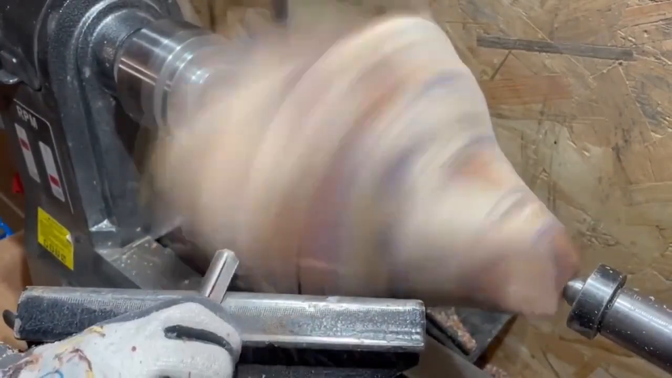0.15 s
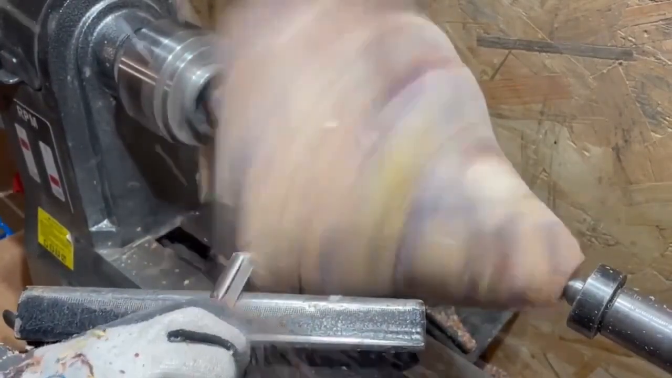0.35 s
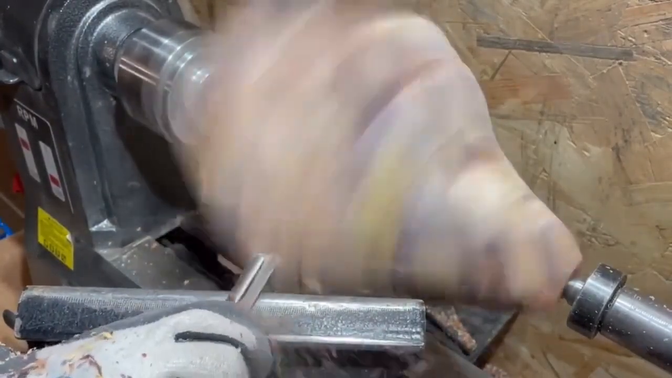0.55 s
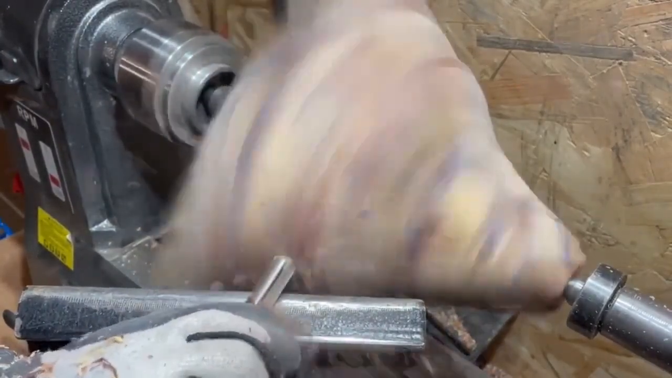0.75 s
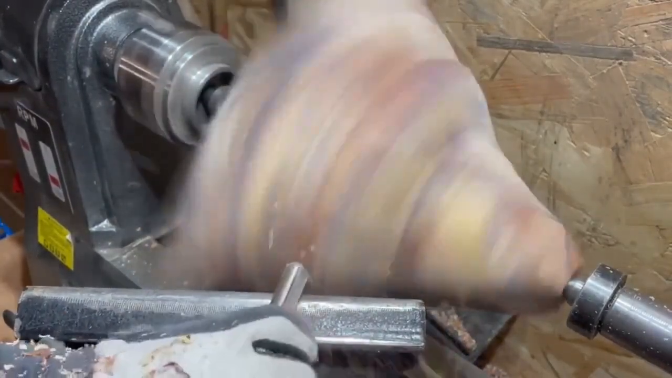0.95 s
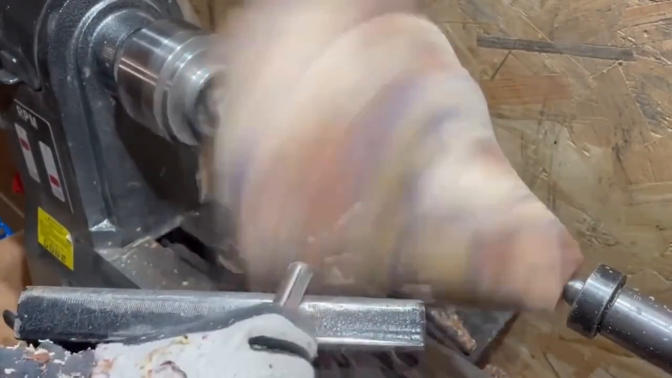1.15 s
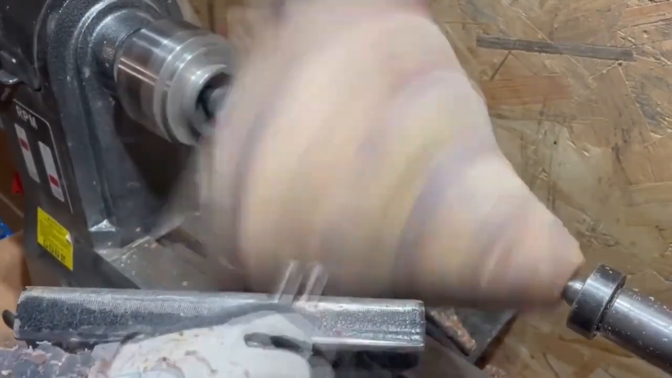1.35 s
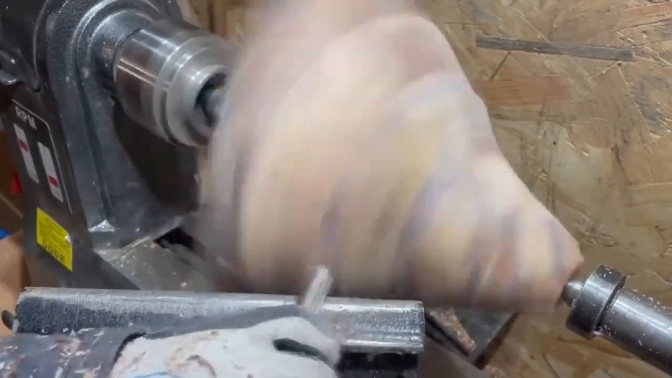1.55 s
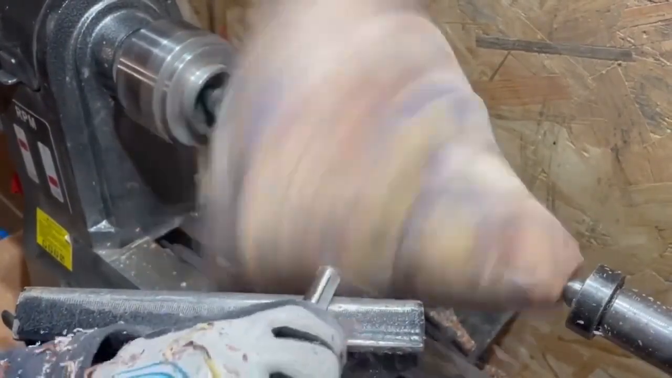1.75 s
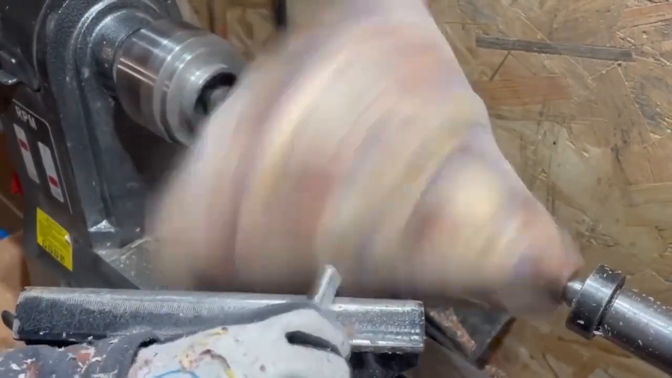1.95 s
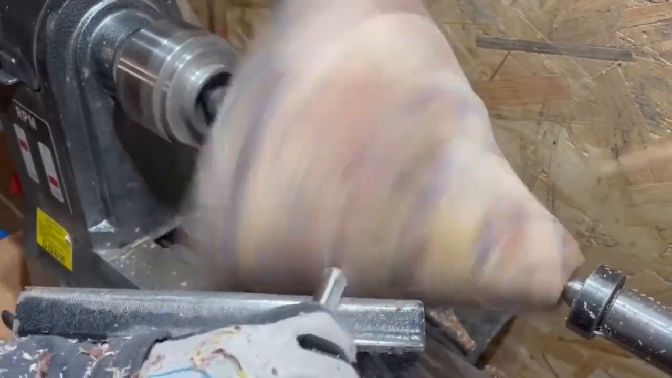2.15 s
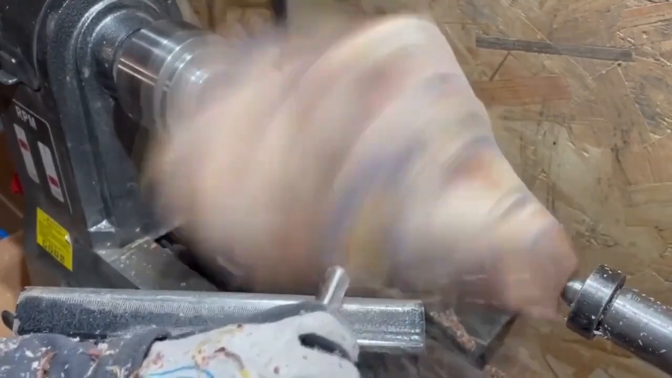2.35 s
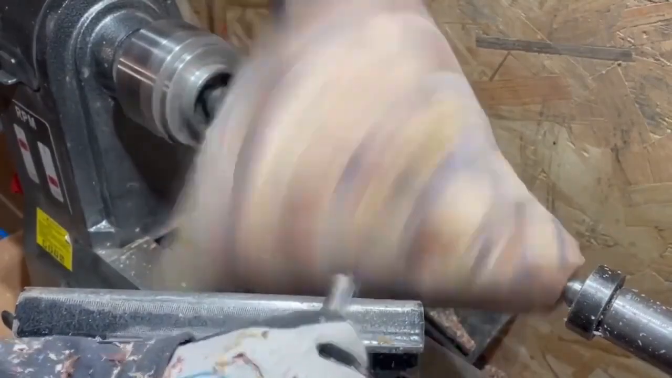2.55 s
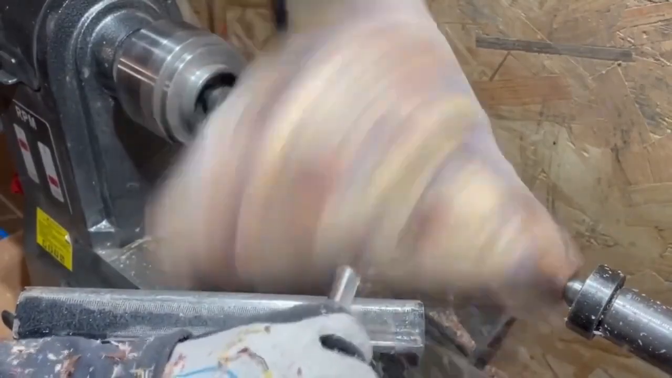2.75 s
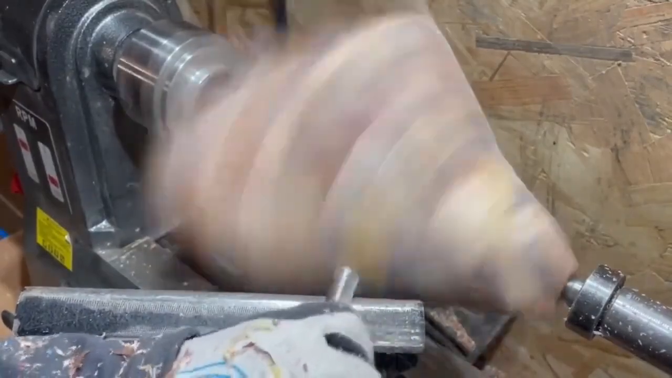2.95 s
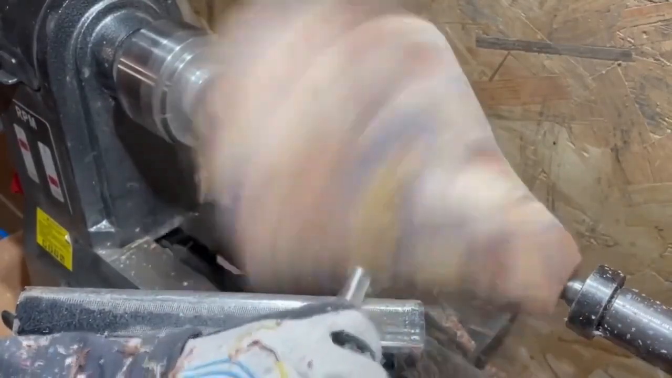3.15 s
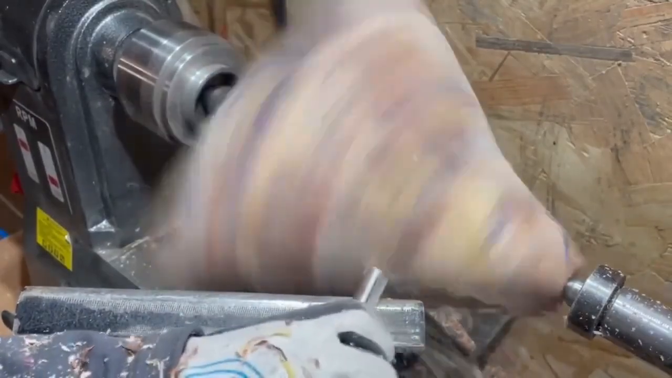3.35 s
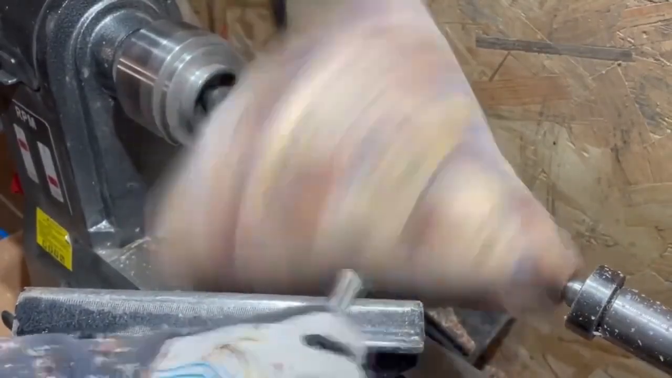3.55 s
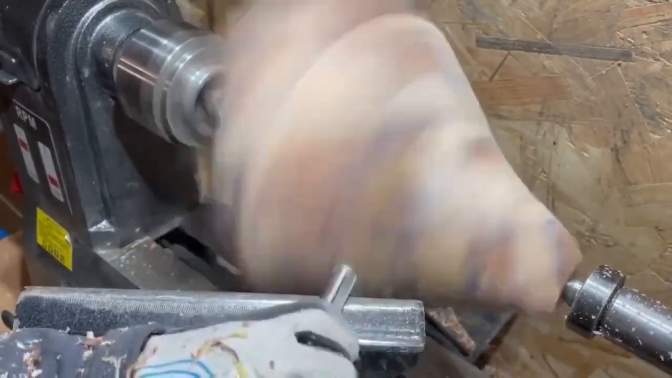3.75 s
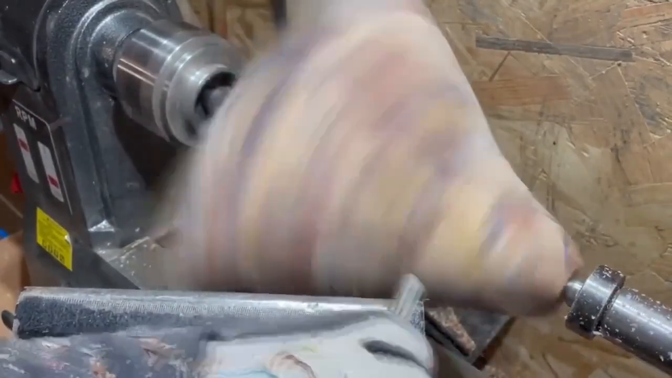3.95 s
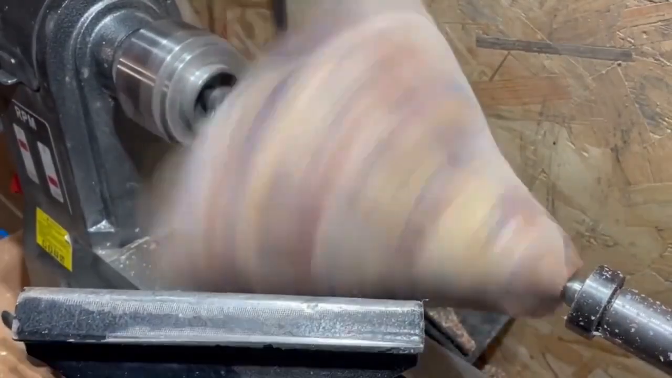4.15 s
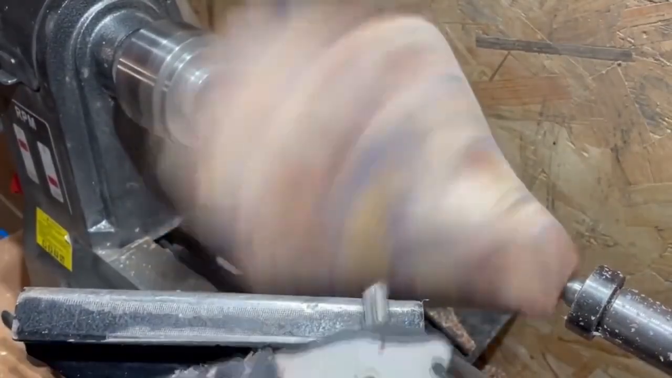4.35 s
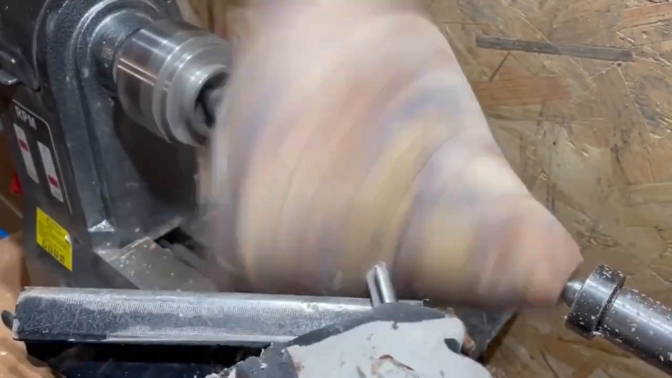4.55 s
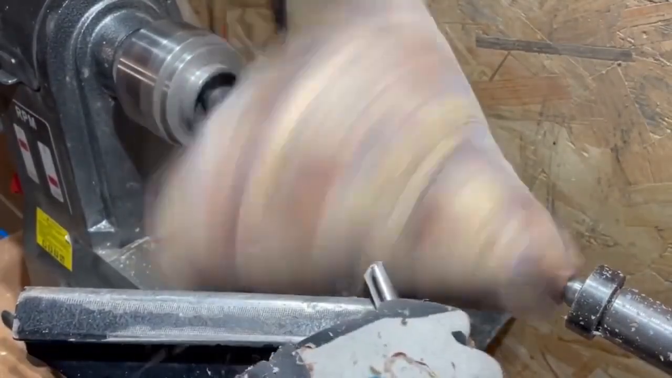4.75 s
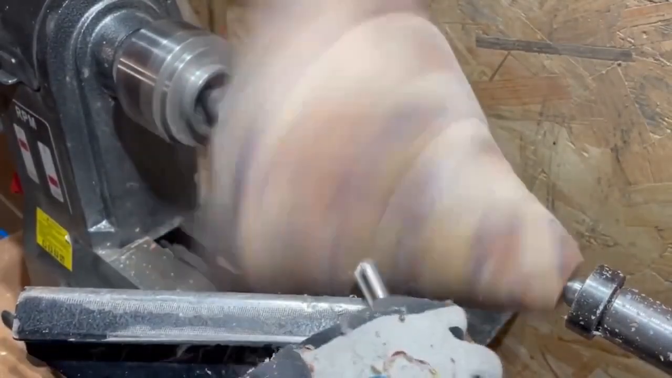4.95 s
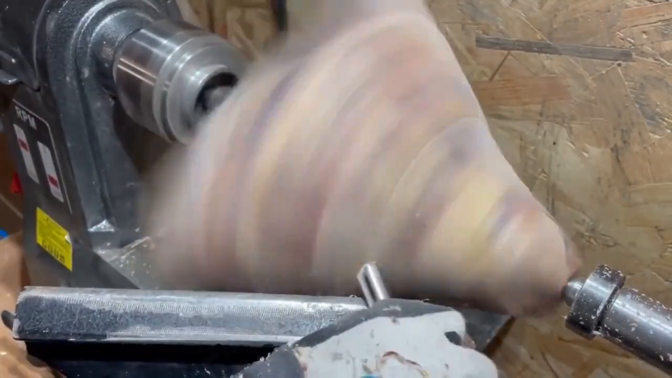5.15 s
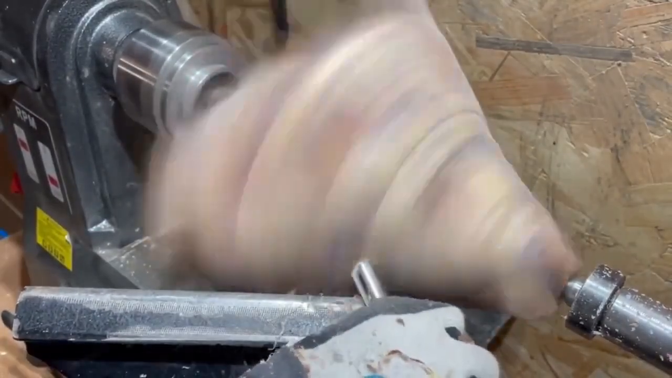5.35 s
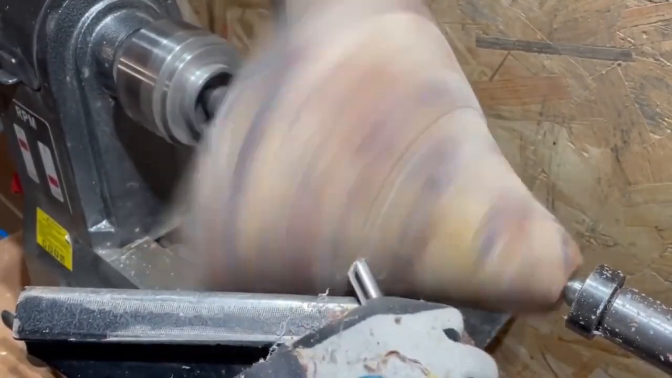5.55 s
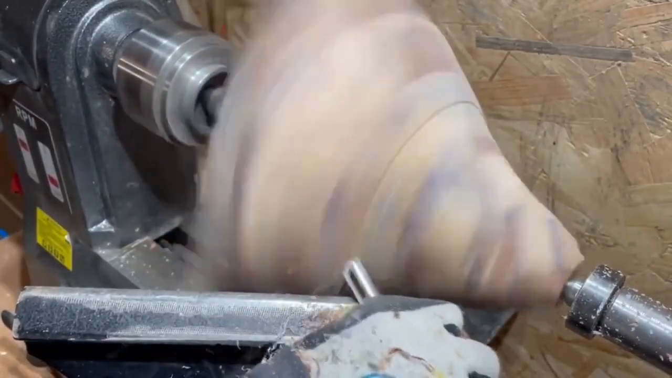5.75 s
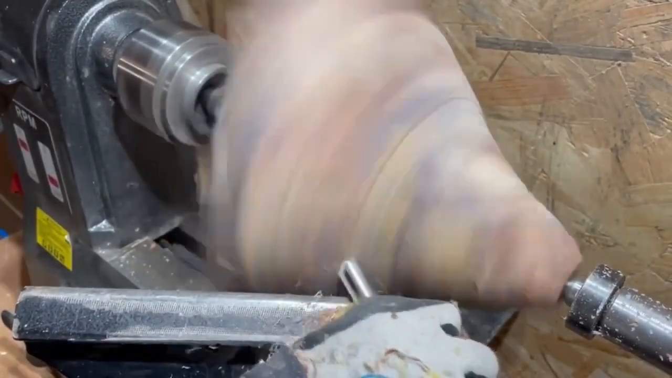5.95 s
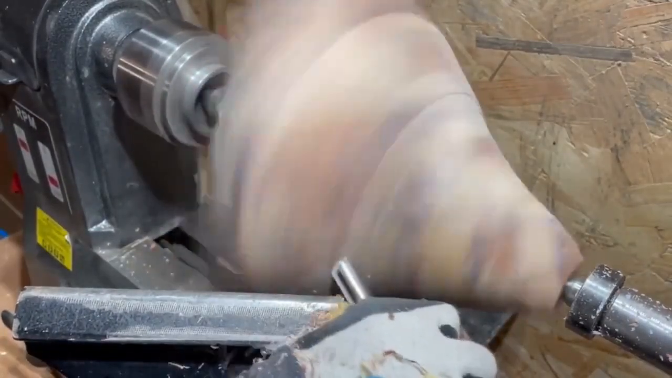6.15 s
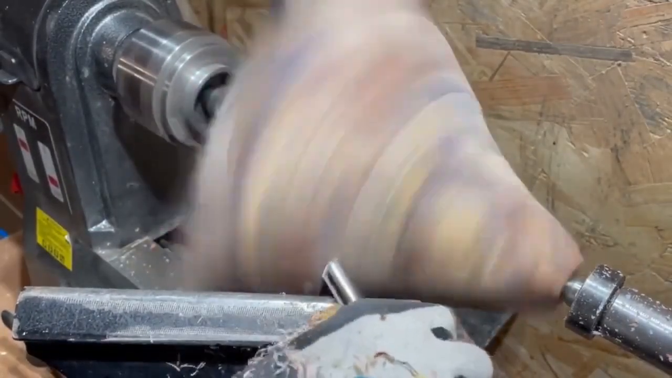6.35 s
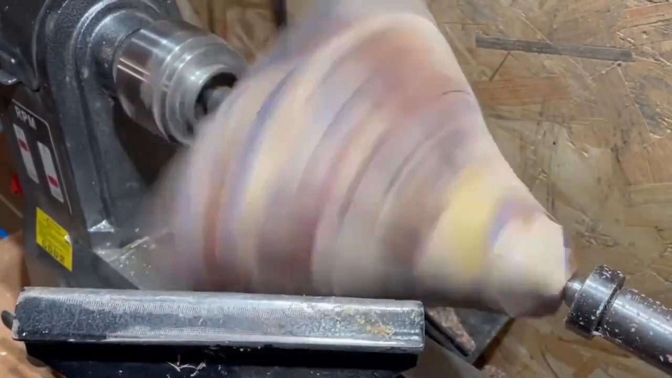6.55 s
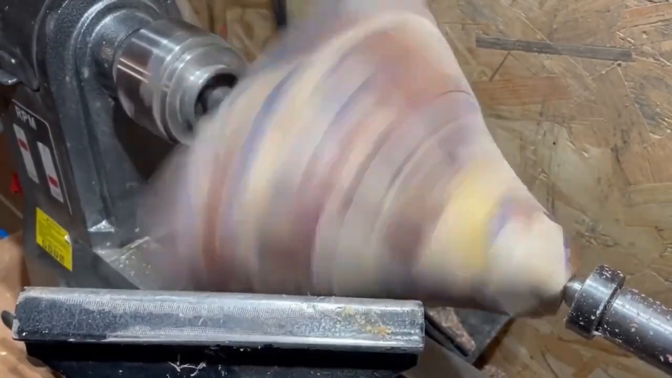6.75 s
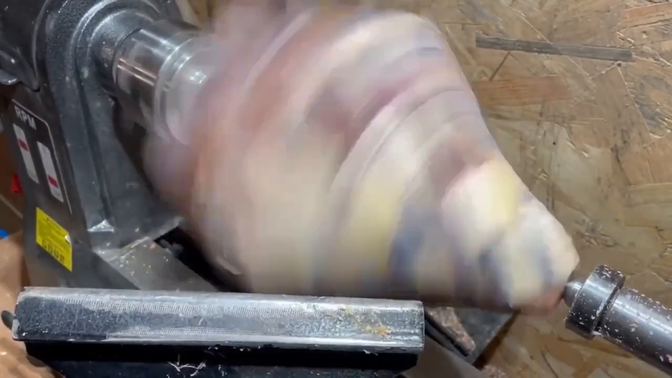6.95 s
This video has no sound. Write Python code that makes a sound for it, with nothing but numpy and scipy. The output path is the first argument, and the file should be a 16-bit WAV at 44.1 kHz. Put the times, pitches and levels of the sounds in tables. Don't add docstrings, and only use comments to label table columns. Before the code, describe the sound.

Close-up wood turning: bright, raspy shaving strokes over a faint motor whine, a short gap, a harsher low grinding cut, then the lathe running alone.

```python
import sys
import numpy as np
from scipy import signal
from scipy.fft import rfft, irfft, next_fast_len
from scipy.io import wavfile
from scipy.ndimage import uniform_filter1d, map_coordinates

SR = 44100
rng = np.random.default_rng(int(sys.argv[2]) if len(sys.argv) > 2 else 0)


def undo_db(level):
    steps = np.asarray(level, float) / 20
    return 10 ** steps


def log_audio(samples):
    frames = np.atleast_2d(samples).T
    limited = np.clip(frames, -1, 1)
    pcm = np.round(limited * 32767).astype(np.int16)
    wavfile.write(sys.argv[1], SR, pcm)


N = 308693

# time_s, hum_level_db, pole_rate_hz
MOTOR_RUN = [
    (0, -60.5, 95.2),
    (.9, -62, 96.45),
    (1.85, -57.5, 94.23),
    (4.05, -57.5, 94.8),
    (4.4, -54, 94.54),
    (6.48, -51.5, 93.9),
    (6.58, -47.5, 94.46),
    (6.72, -47.5, 94.4),
    (7, -48, 92.2),
]


def unit(x):
    return x / np.sqrt(np.mean(x ** 2) + 1e-20)


def along(points, hz):
    f, v = np.transpose(points)
    return np.interp(np.log(hz + 1), np.log(f + 1), v)


def curves(rows):
    s, *cols = np.transpose(rows)
    return [np.interp(np.arange(N) / SR, s, c) for c in cols]


def bumps(rows, column):
    t = np.arange(N) / SR
    return sum(row[column] * np.exp(-((t - row[0]) / row[1]) ** 2) for row in rows)


def wobble(rate):
    knots = rng.standard_normal(int(N * rate / SR) + 4)
    return map_coordinates(knots, [np.arange(N) * rate / SR])


def filtered(x, response):
    m = next_fast_len(N + SR // 2)
    return irfft(rfft(x, m) * response(np.fft.rfftfreq(m, 1 / SR)), m)[..., :N]


def shaped(x, spectrum):
    return unit(filtered(x, lambda hz: undo_db(along(spectrum, hz))))


def rung(x, modes):
    def body(f):
        response = 0
        for k, (centre, width, db) in enumerate(modes):
            damping = 1j * f * width
            response = response + (-1) ** k * undo_db(db) * damping / (centre * centre - f * f + damping)
        return response
    return unit(filtered(x, body))


def tearing(rate, spread_db, smooth):
    moment, sign, size = rng.random((3, N))
    snaps = (moment < rate / SR) * np.sign(sign - .5) * undo_db(-spread_db * np.log(size + 0.067))
    return unit(snaps) + smooth * rng.standard_normal(N)


def gain_control(level):
    duck = 1 / (1 + np.abs(uniform_filter1d(level, size=1500)) / undo_db(-40))
    return undo_db(curves(MOTOR_RUN)[0]), duck


def motor(level):
    # pitch_hz, level_db (per Hz)
    casing_spectrum = [(20, -8), (60, -2.5), (250, -5), (700, -1.5), (830, -11.5), (900, -12.5),
                       (1100, -16), (3000, -23.5), (6000, -37), (9000, -27), (10000, -8.5), (10900, -55),
                       (13200, -76), (14000, -56), (15700, -100)]
    # pitch_hz, level_db (per Hz)
    crumb_spectrum = [(900, -17), (1500, -9), (3500, 2), (3900, 2), (7000, -21), (9000, -28)]
    # pitch_hz, level_db (per Hz)
    dust_spectrum = [(6000, -20), (10500, 5), (14500, -4), (15700, -18)]
    # time_s, half_length_s, chips_db, dust_db
    showers = [
        (0, .3, -4, -5),
        (4.05, .04, 7, 12),
        (4.2, .05, 12, 18),
        (4.31, .05, 8, 19),
        (6.57, 0.073, 9, -22),
        (6.72, .12, 9, -20),
        (6.88, .12, 10, -22),
        (6.98, .05, 8, 11),
    ]
    gain, duck = gain_control(level)
    crumbs_db = -30 + bumps(showers, column=2)
    dust_db = -33 + bumps(showers, column=3)
    casing = undo_db(3.5 + 1.0 * wobble(25)) * shaped(rng.standard_normal(N), casing_spectrum)
    chips = undo_db(2 * wobble(22)) * tearing(900, spread_db=4.5, smooth=.4)
    patter = undo_db(crumbs_db) * shaped(chips, crumb_spectrum) + undo_db(dust_db) * shaped(chips, dust_spectrum)
    return gain * duck ** 0.092 * (casing + patter)


def drive(level):
    # multiple_of_pole_rate, level_db
    hum_orders = [(1, -12.5), (2, -12.5), (3, -2), (4, -12), (6, -6), (7, 3), (8, -4)]
    # pitch_hz, level_db (to the hum), port_phase_rad (off centre), unrest_rad
    whine_tones = [(9970, -9, 1.15, .55), (10156, -26, 1.15, .5), (9784, -28, 1.15, .5),
                   (13860, -36, .85, 1.3), (14150, -42, 1.1, 4)]
    gain, duck = gain_control(level)
    clock = 2 * np.pi * np.arange(N) / SR
    port = np.array([[1], [-1]])
    turn = 2 * np.pi * np.cumsum(curves(MOTOR_RUN)[1] * (1 + 0.0033 * wobble(5))) / SR
    hum = 0
    for k, db in hum_orders:
        phase = k * turn + (0.38 + 0.15 * k) * wobble(16) + port * 0.066 * k
        hum = hum + undo_db(db + 2.2 * wobble(18)) * np.sin(phase)
    whine = 0
    for hz, db, off, unrest in whine_tones:
        phase = hz * clock + unrest * wobble(53) + port * off
        whine = whine + undo_db(db + 2.4 * wobble(25)) * np.sin(phase)
    return gain * (undo_db(2.0) * duck ** 0.36 * hum + undo_db(10.5) * duck ** .8 * whine)


def contact():
    # touch_s, lift_s, in_level_db, out_level_db, entry_s
    strokes = [(0.094, 0.871, -36, -32.5, 0.13), (0.895, 1.122, -31.5, -37.5, 0.046),
               (1.116, 1.341, -36.5, -29, 0.018), (1.321, 1.805, -31, -37.5, 0.074),
               (1.86, 2, -44, -22.5, .16), (1.993, 2.157, -48.5, -27, 0.041),
               (2.155, 2.253, -24, -38.5, 0.024), (2.27, 2.478, -26.5, -35, 0.052),
               (2.476, 2.58, -36, -40, 0.024), (2.602, 2.955, -25.5, -37.5, 0.12),
               (2.924, 3.559, -32, -35, 0.16), (3.611, 3.884, -32.5, -41.5, 0.11),
               (3.856, 4.002, -38.5, -38.5, 0.066), (4.421, 4.686, -42, -36.5, 0.062),
               (4.648, 5.028, -37, -26.5, 0.094), (5.008, 5.157, -37.5, -25.5, 0.029),
               (5.121, 5.535, -30.5, -25.5, 0.061), (5.518, 6.403, -29, -31.5, .031)]
    # time_s, half_length_s, change_db
    nudges = [(.466, .019, 2.5), (.626, 0.1, 2), (.961, 0.0061, -13), (1.462, .012, 2),
              (1.605, 0.028, -5.5), (1.763, 0.016, 6), (2.09, .026, -3.5), (2.121, 0.0073, 6),
              (2.78, 0.028, -4.5), (3.023, 0.012, -8), (3.181, 0.0098, 4.5), (3.371, 0.021, -4.5),
              (3.477, 0.032, -3.5), (4.594, .038, 6.5), (5.312, 0.025, -0.5), (5.492, 0.025, -5.5),
              (5.591, 0.019, 0.5), (5.981, .073, -2), (6.06, .088, 3)]
    exit_s, ease_power = 0.039, 1.44
    level, t = np.zeros(N), np.arange(N) / SR
    for touch, lift, in_db, out_db, entry in strokes:
        span = slice(round(touch * SR), round(lift * SR))
        now = t[span]
        ease = np.clip((now - touch) / entry, 0, 1) * np.clip((lift - now) / exit_s, 0, 1)
        stroke = undo_db(np.interp(now, [touch, lift], [in_db, out_db])) * ease ** ease_power
        level[span] = np.maximum(level[span], stroke)
    return level * undo_db(0.84 + bumps(nudges, column=2))


def bite():
    # time_s, depth (0-1), looseness (0-1, of the tool on its rest)
    bite_path = [(0, 0, 0), (.75, 0.11, 0.48), (1.3, 0.13, 0.23), (2, 0.1, .1), (2.4, .26, 0),
                 (2.8, 0.24, .02), (3.2, 0.5, 0), (3.7, 0.12, 0.66), (4, 0.66, 0.8), (4.5, 0.48, 0.83),
                 (4.8, .84, 0.36), (5, 0.97, 0.96), (5.12, 0.86, 1), (5.3, 0.98, 0.58), (5.8, 0.97, 0.34),
                 (6.4, 0.97, 1)]
    depth, loose = np.clip(curves(bite_path), 0, 1)

    def layer(db, power=1):
        return undo_db(db[0] + db[1] * depth ** power + db[2] * loose)
    return depth, layer


def patchy(x, depth_db):
    z = signal.stft(x, nperseg=512)[2]
    field = uniform_filter1d(rng.standard_normal(z.shape), size=5, axis=0)
    field = uniform_filter1d(field, size=10, axis=1)
    return unit(signal.istft(z * undo_db(depth_db * unit(field)), nperseg=512)[1][:N])


def gouge(level):
    # pitch_hz, width_hz, level_db
    light_modes = [(1530, 20, -19), (2197, 230, -5.5), (2560, 135, -3.5), (2720, 130, -4), (2957, 56, -0.5),
                   (3200, 110, -4), (4270, 200, -7), (4760, 52, -3.5), (5126, 253, -6), (6366, 76, -5)]
    deep_modes = [(826, 480, -13), (1233, 140, 2), (1346, 176, -2), (1594, 61, 1.5), (1753, 35, -9),
                  (2198, 51, -3), (2373, 80, 5.5), (2430, 245, 0.5), (2982, 72, 0.5), (4153, 95, -5.5),
                  (5290, 280, -12)]
    # pitch_hz, level_db (per Hz)
    shaving_spectrum = [(350, -69), (600, -25.5), (1820, -14.5), (2210, -23.5), (3040, -5.5), (3480, -7.5),
                        (3700, 0), (3980, 4), (5250, -18), (7000, -11.5), (9100, -4.5), (15400, -120)]
    ripping_spectrum = [(290, -7.5), (500, -10), (1060, -8), (1250, -4), (1990, -4), (2170, -8.5),
                        (2990, -2.5), (3770, -15), (4170, -10), (7000, -28.5), (9100, -64), (15400, -120)]
    # pitch_hz, level_db (per Hz)
    fizz_spectrum = [(2000, -45), (5000, -15), (6000, -8), (8000, 1.5), (9500, 1.5), (10500, 1),
                     (11500, -4.5), (13000, -2.5), (14500, -5.5), (15300, -20), (15750, -25)]
    # pitch_hz, width_hz
    shank_mode = (3700, 45)
    # pitch_hz, width_hz, level_db
    rest_modes = [(775, 140, -9.5), (1256, 78, 1.5), (2180, 32, 4.5), (4240, 50, -3.5)]
    post_modes = [(840, 51, 0), (925, 79, -0.83), (984, 50, -2)]
    # at_rest_db, full_depth_db (added), full_looseness_db (added)
    shank_db = (-8.5, -32, 1)
    rest_db = (-30.5, 0.9, 27)
    fizz_db = (-3, -11, -1)
    # time_s, half_length_s, rise_db
    sings = [
        (.45, .3, 5),
        (1.8, .3, 3),
        (4.9, .25, 8),
    ]
    # time_s, half_length_s, rise_db
    clanks = [
        (4.985, 0.022, 21),
        (5.1, .025, 29),
        (6.385, 0.041, 33),
    ]
    depth, layer = bite()
    grain = undo_db(0.4 * wobble(22) + 0.7 * wobble(50) + 1.4 * wobble(170))
    tear, scrape, hiss = (patchy(tearing(7000, spread_db=3.5, smooth=1.61), depth_db=0.8) * grain
                          for _ in range(3))
    light = undo_db(-2.5) * rung(tear, light_modes) + undo_db(-5.0) * shaped(scrape, shaving_spectrum)
    deep = undo_db(-4.5) * rung(tear, deep_modes) + undo_db(-6.5) * shaped(scrape, ripping_spectrum)
    shank_gain = layer(shank_db, power=3.8) * undo_db(bumps(sings, column=2))
    shank = shank_gain * rung(tear, [(*shank_mode, 0)])
    rest = layer(rest_db) * rung(scrape, rest_modes)
    post = undo_db(-34 + bumps(clanks, column=2)) * rung(scrape, post_modes)
    fizz = layer(fizz_db) * shaped(hiss, fizz_spectrum)
    cut = np.sqrt(1 - depth) * light + np.sqrt(depth) * deep
    return undo_db(-1.0) * level * (cut + shank + rest + post + fizz)


def machine(level):
    # pitch_hz, width_hz, level_db
    bed_modes = [(154, 25, -8), (274.4, 11.7, 8), (334.5, 25, 0.5), (548, 62, -7)]
    stand_modes = [(61.5, 26.6, -3.5), (115, 44, 1.5), (286, 85, -5.5)]
    blank_modes = [(156.7, 12, -2.5), (363.5, 27.4, -4), (419, 35.5, -0.5)]
    # at_rest_db, full_depth_db (added), full_looseness_db (added)
    bed_db = (-17, 4.5, 3)
    stand_db = (-14.5, -13, 3)
    blank_db = (-26.5, 11, 2)
    # time_s, half_length_s, stand_db, blank_db
    jolts = [
        (.1, 0.08, 9, 0),
        (0.787, .08, 2.5, 2),
        (2.077, 0.14, 1, 4.5),
        (2.877, 0.12, 10, 9),
        (3.21, 0.063, 16, 0.5),
        (3.756, 0.22, .1, 8),
        (5.205, 0.11, 6, 0),
        (6.1, 0.62, -7, 5),
        (6.4, 0.15, 12, 1),
    ]
    heavy = np.abs(uniform_filter1d(level, size=900))
    layer = bite()[1]

    def shaken(modes):
        return undo_db(0.37 * wobble(16)) * rung(rng.standard_normal(N), modes)
    bed = layer(bed_db) * shaken(bed_modes)
    stand = layer(stand_db) * undo_db(bumps(jolts, column=2)) * shaken(stand_modes)
    blank = layer(blank_db) * undo_db(bumps(jolts, column=3)) * shaken(blank_modes)
    return heavy * (bed + stand + blank)


def taps():
    # time_s, peak_db, treble_db
    touches = [
        (4.0864, -61, -12),
        (4.3074, -56, -12),
        (4.3615, -34, 0.5),
        (6.4394, -44, -20),
        (6.5234, -38.5, -20),
        (6.5544, -44, -20),
        (6.577, -38, -27),
        (6.9064, -45, -22),
    ]
    hits = np.zeros((2, N + SR))
    t = np.arange(-600, 1200) / SR
    for s, db, treble_db in touches:
        scatter = undo_db(-60 * np.abs(t) / 0.033) * rng.standard_normal(len(t))
        touch = 2.0 * (t == 0) + 0.33 * scatter
        hits[:, round(s * SR) - 600:][:, :len(t)] += undo_db([[db + 5.5], [db + treble_db]]) * touch

    def body(hz):
        low = along([(600, -14.0), (2000, 4), (5000, -7.5), (8000, -41)], hz)
        high = along([(4000, -16), (6500, 1), (14000, -4), (15700, -40)], hz)
        return undo_db([low, high])
    return filtered(hits[:, :N], body).sum(axis=0)


def walls(x, t60):
    # pitch_hz, level_db (to direct)
    diffuse_spectrum = [(30, -17), (60, -21), (150, -15), (300, -7), (600, 0), (1200, -3), (2500, -5),
                        (5000, -3), (6800, -1), (8000, -15), (9600, -16), (10500, -4), (11800, -3),
                        (12800, -13)]
    hop = 4096
    count = N // hop + 2
    padded = np.pad(x, (hop, 2 * hop))
    pieces = np.lib.stride_tricks.sliding_window_view(padded, 2 * hop)[::hop][:count]
    fade = np.sin(np.pi * np.arange(2 * hop) / (2 * hop))
    decay = undo_db(-60 * np.arange(hop) / SR / t60)
    tails = rng.standard_normal((2, count, hop)) * decay / np.linalg.norm(decay)
    answers = signal.fftconvolve((pieces * fade)[None], tails, axes=2)
    wet = np.zeros((2, (count + 3) * hop))
    for k in range(count):
        wet[:, k * hop:][:, :answers.shape[2]] += answers[:, k]
    return filtered(wet[:, hop:hop + N], lambda hz: undo_db(along(diffuse_spectrum, hz)))


def scene():
    # pitch_hz, phase_rad
    left_lead = [(150, 0), (500, -.5), (2000, -.1), (3500, .75), (5300, .4), (6000, -.6), (7100, -1.2),
                 (7700, -2.5), (8200, -3.1), (9600, -3.3), (10200, -3.9), (10800, -4.5), (12200, -6.28)]
    # pitch_hz, level_db
    left_level = [(200, 0), (700, -1.5), (1200, 1.5), (2200, 5), (3200, 5), (4000, 2.5), (5500, 2),
                  (7500, 0)]
    level = contact()
    sound = undo_db(-0.5) * (motor(level) + gouge(level) + machine(level) + taps())
    side = np.array([[.5], [-.5]])

    def ports(hz):
        return undo_db(side * along(left_level, hz)) * np.exp(1j * side * along(left_lead, hz))
    direct = filtered(np.array([sound, sound]), ports)
    return drive(level) + direct + walls(sound, t60=.05)


def band_limit(x):
    return signal.sosfilt(signal.butter(12, 15740, fs=SR, output="sos"), x)


def record(dry):
    block, flutter_db = 1024, .9
    ripple = np.cos(2 * np.pi * (np.arange(N) - 144) / block)
    return band_limit(dry * undo_db(flutter_db * ripple))


dry = scene()
out = record(dry)
log_audio(out)
```